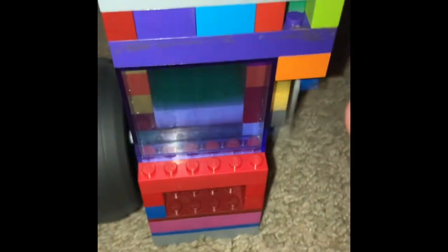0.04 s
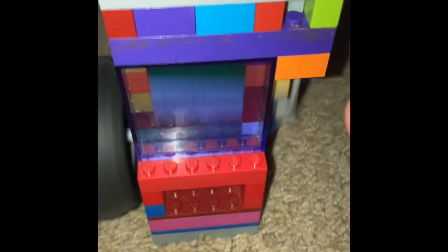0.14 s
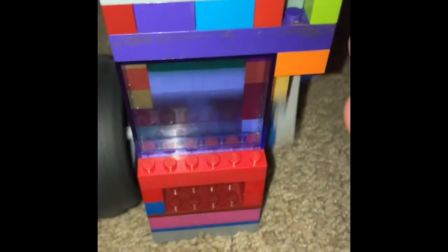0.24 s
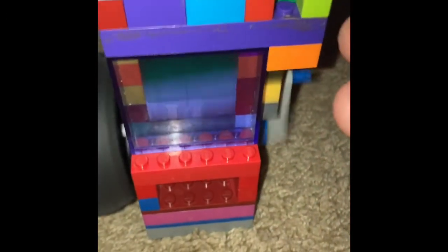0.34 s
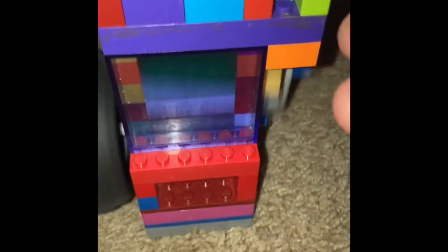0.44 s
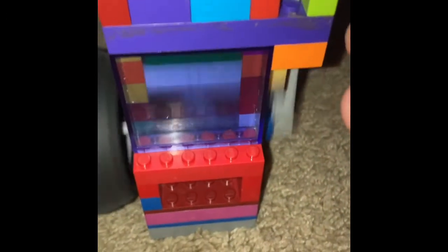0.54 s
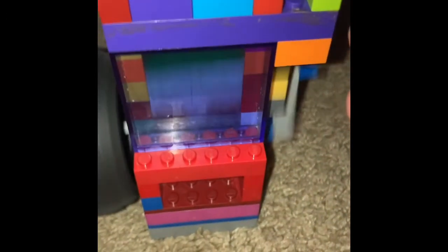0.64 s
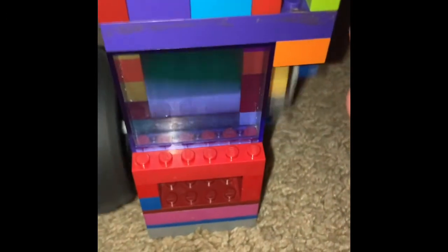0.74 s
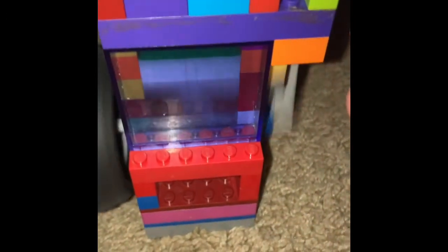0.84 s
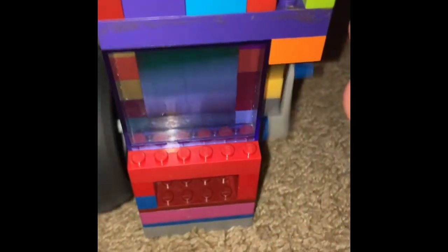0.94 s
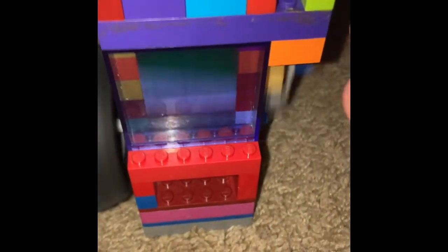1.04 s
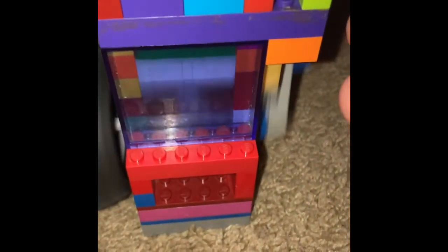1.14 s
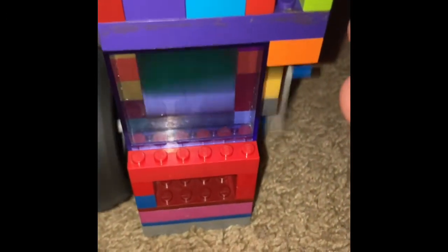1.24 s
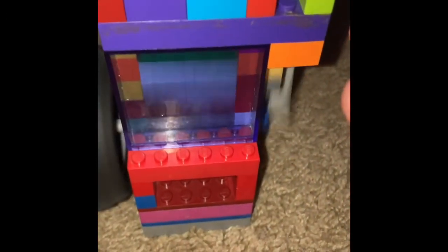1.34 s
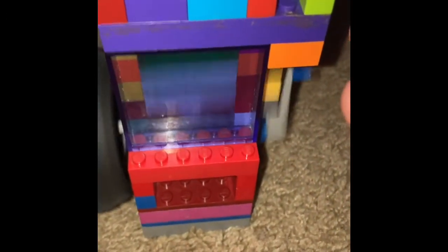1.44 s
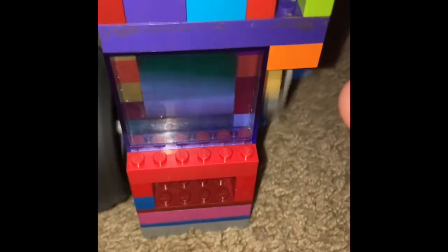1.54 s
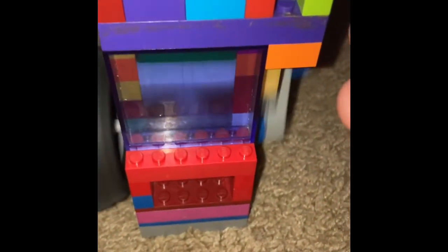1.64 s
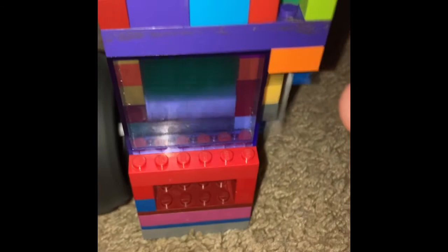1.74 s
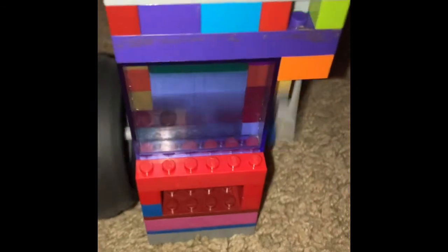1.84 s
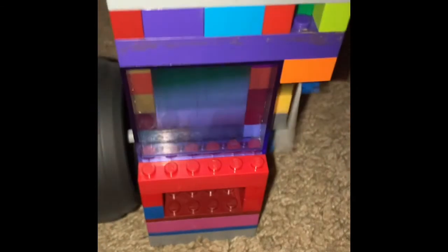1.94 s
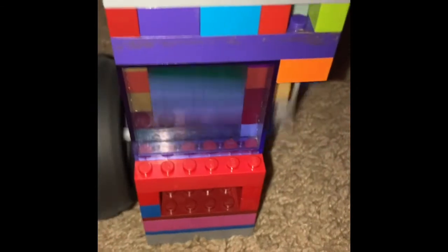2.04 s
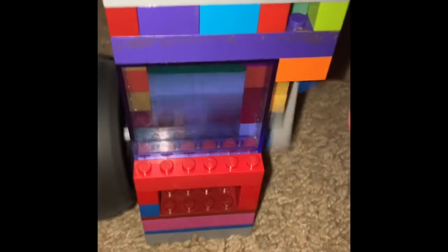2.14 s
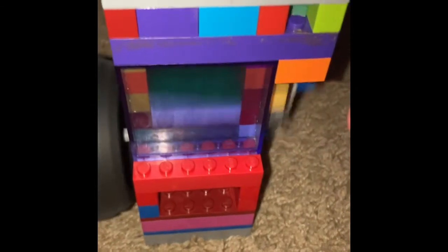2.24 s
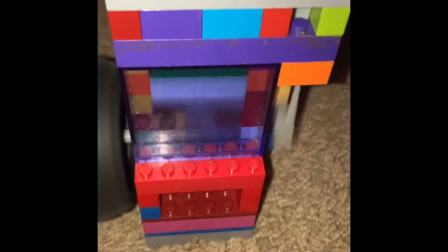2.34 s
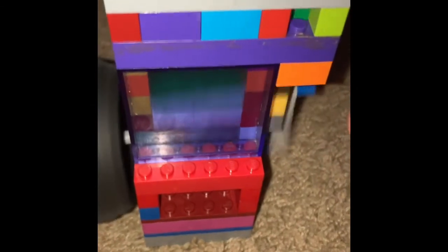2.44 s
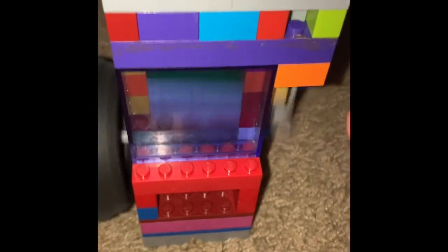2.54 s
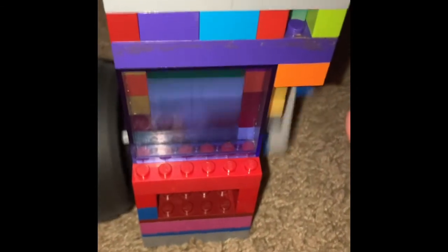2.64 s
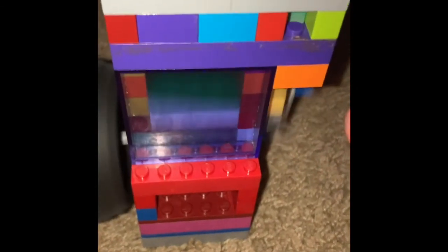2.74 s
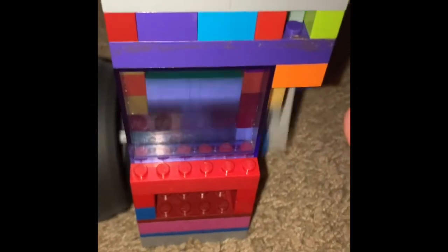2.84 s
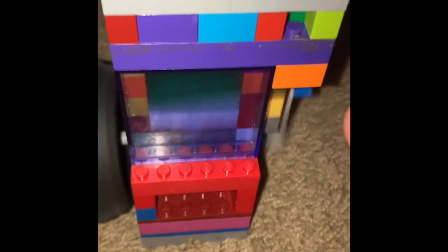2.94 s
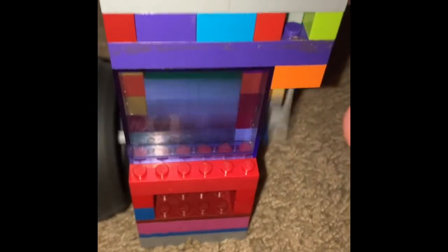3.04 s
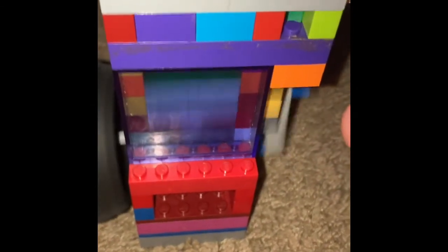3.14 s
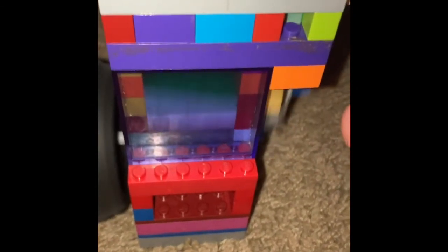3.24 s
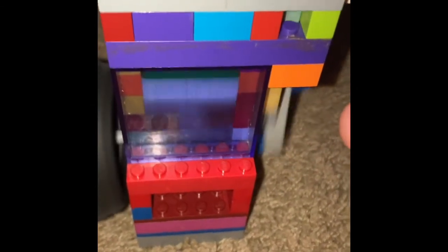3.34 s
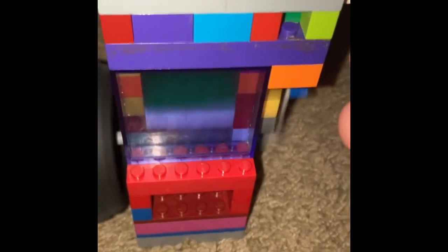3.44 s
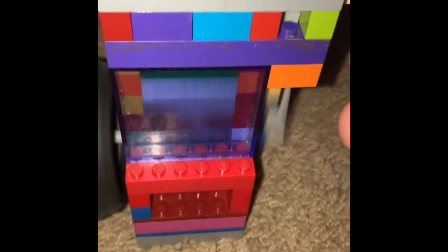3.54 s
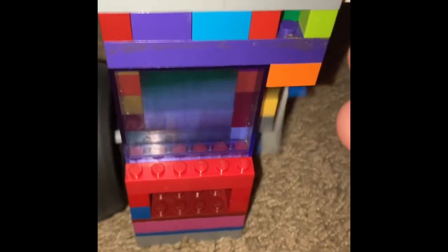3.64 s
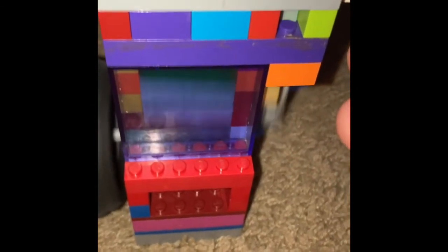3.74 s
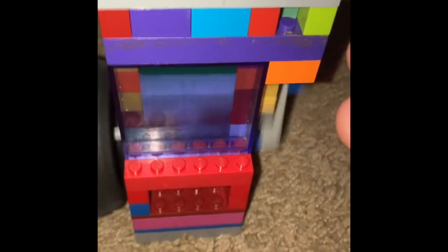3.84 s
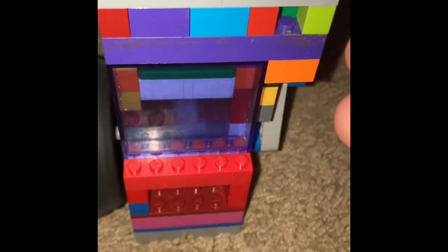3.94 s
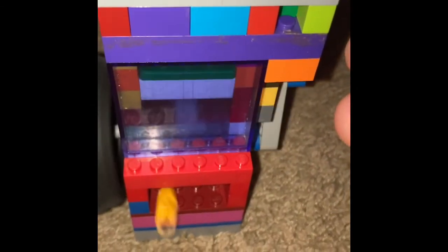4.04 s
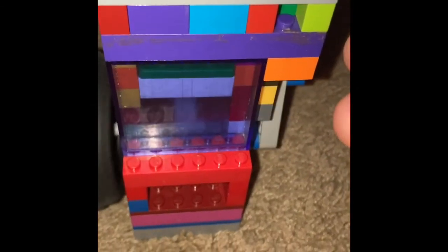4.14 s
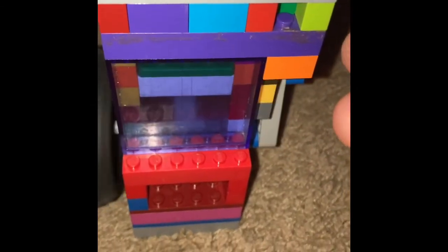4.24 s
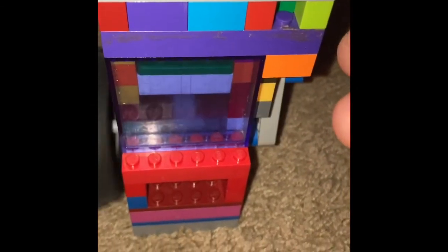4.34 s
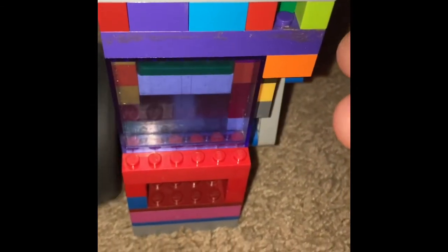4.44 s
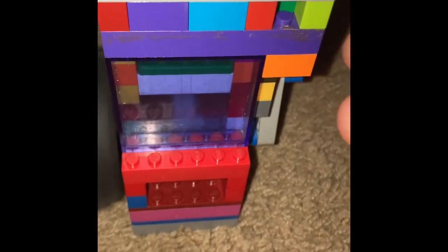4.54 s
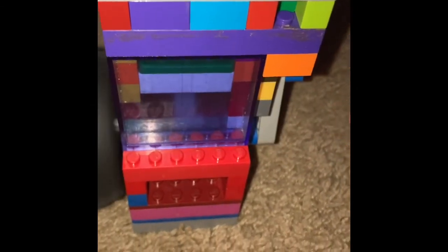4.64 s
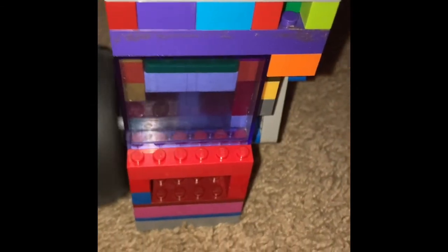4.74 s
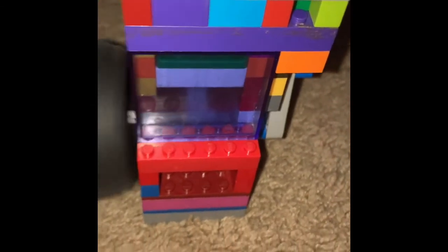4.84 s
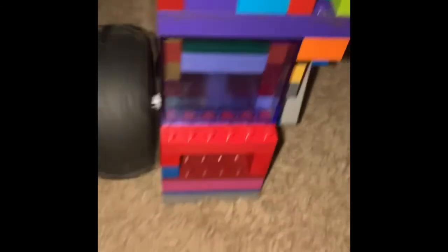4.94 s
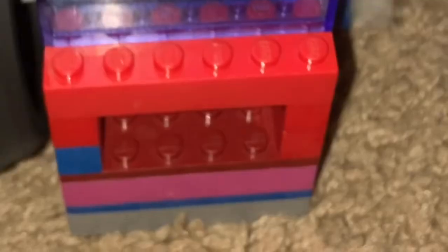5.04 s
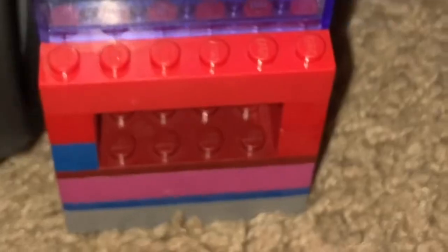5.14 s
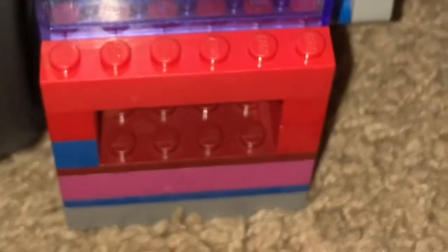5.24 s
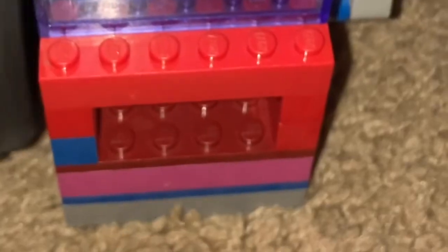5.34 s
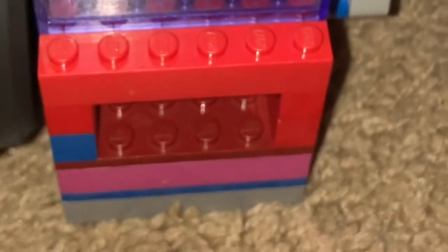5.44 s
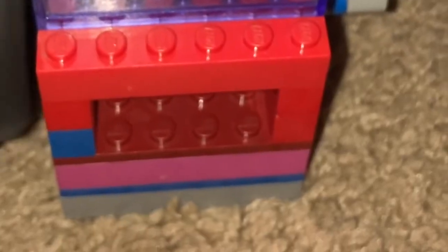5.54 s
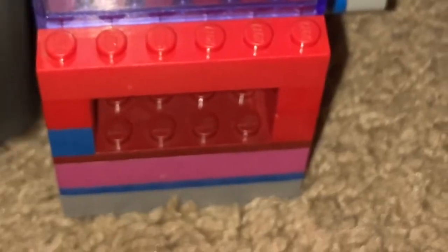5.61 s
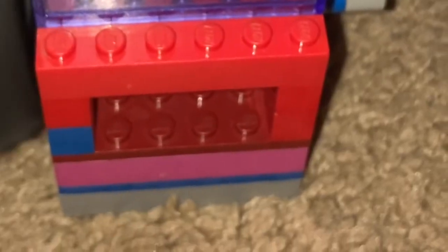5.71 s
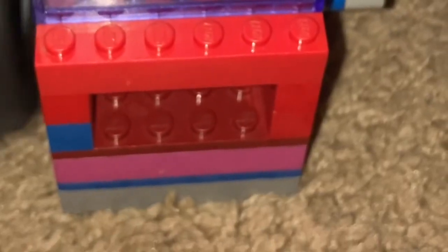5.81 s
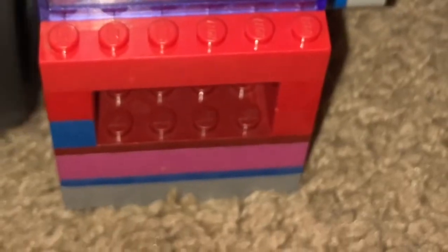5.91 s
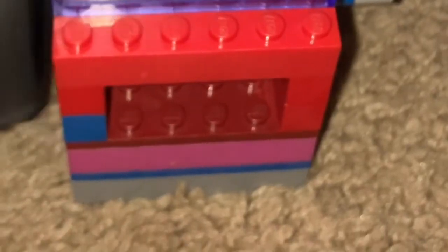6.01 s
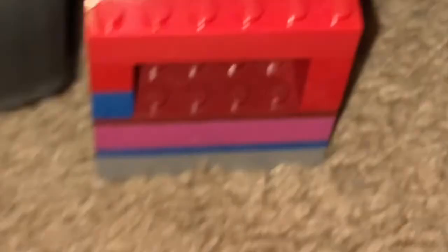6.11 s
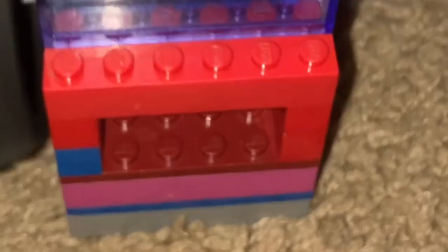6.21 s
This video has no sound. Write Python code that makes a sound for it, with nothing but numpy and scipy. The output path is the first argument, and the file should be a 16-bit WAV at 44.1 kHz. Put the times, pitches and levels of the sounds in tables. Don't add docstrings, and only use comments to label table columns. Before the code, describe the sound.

Rapid hollow plastic knocking and hissing air over a vacuum cleaner's drone stop with a clack; the stall repeats, then a deeper slowed rattle begins.

```python
import sys
import numpy as np
from scipy import signal
from scipy.fft import rfft, irfft, next_fast_len
from scipy.io import wavfile
from scipy.ndimage import uniform_filter1d, map_coordinates

SR = 44100
rng = np.random.default_rng(int(sys.argv[2]) if len(sys.argv) > 2 else 0)


def bounce(signal):
    frames = np.transpose(np.atleast_2d(signal))
    limited = np.clip(frames, -1, 1)
    pcm = np.round(limited * 32767).astype(np.int16)
    wavfile.write(sys.argv[1], SR, pcm)


def level_to_linear(level):
    exponent = np.asarray(level, float) / 20
    return 10 ** exponent


N = 276507
TIME = np.arange(N) / SR
SIZE = next_fast_len(N)
HZ = np.fft.rfftfreq(SIZE, 1 / SR)

# [f/Hz, level/dB]
CLEANER_ROAR = [(28, -48), (60, -13), (110, -13), (200, 2), (350, -0.5), (420, -10), (560, -15), (680, -6),
                (950, -8), (1200, -16.5), (2500, -24.5), (5000, -21.5), (9500, -14.5), (15500, -16.5)]
# [f/Hz, level re roar/dB]
MOTOR_LINES = [(632.5, -8.5), (897, -16), (119.8, -19.5)]
# [t/s, speed/(turns/s)]
CRANK_SPEED = [(0, 22.63), (.3, 23.083), (.6, 23.183), (1, 23.879), (1.6, 24.178), (2, 24.24),
               (2.3, 23.886), (2.6, 24.137), (3.3, 24.102), (3.9, 24.329)]
# [multiple of crank speed, level/dB]
HOSE_ORDERS = [(1, -34), (2, -28), (3, 0), (4, -14), (5, -1), (6, -15), (7, -3.5), (8, -6.5), (9, -5.5),
               (10, -7), (11, -10.5), (12, -10.5), (13, -12), (14, -27.5), (15, -14.5), (16, -16), (17, -6),
               (18, -14.5), (19, -10), (20, -14), (21, -17.5), (22, -19)]
# [angle/turns, cylinder ring/dB, base thud/dB, wall clack/dB, stud tick/dB]
TURN_KNOCKS = [(-.04, -13, -39, -28, -22.5), (.0, -74, -58, -26.5, -26), (0.157, -31.5, -26.5, -56, -34.5),
               (0.261, -14.5, -29.5, -26, -22), (0.388, -19.5, -25, -22.5, -39),
               (0.434, -20.5, -35, -30, -22), (0.522, -24, -39, -42.5, -23), (0.673, -42, -26, -27, -22),
               (0.717, -35, -25, -44, -23.5), (0.778, -54, -43, -25, -30), (0.84, -28, -35, -28.5, -27.5)]
# [t/s, ring/dB, thud/dB, clack/dB, tick/dB]
STALL_KNOCKS = [
    (3.891, -22.5, -20, -26, -23),
    (3.899, -34, -37, -19, -31),
    (3.921, -44, -44, -25, -26),
]
# [f/Hz, width/Hz, level/dB]
CYLINDER_MODES = [(1378, 45, -9), (1345, 260, 17.5), (1290, 70, -14), (1090, 130, -6), (840, 110, -11),
                  (660, 120, -12)]
# [f/Hz, width/Hz, level/dB]
BASE_MODES = [(398, 76, -10), (588, 56, -6.5), (724, 240, 23)]
# [f/Hz, level/dB]
WALL_CLACK = [(900, -66), (1600, 4.5), (2100, -2.5), (2800, 1), (3300, -9), (4150, 6.5), (5200, -1),
              (6500, -8)]
# [f/Hz, level/dB]
STUD_TICK = [(3000, -6), (5500, -12.5), (6800, -7.5), (8000, 1.5), (9600, 3), (11000, -5.5), (13000, -16.5),
             (16000, -14.5)]
# [f/Hz, level/dB]
AIR_LEAK = [(40, -39), (150, -10), (400, -8), (900, -7), (1300, -2.5), (1500, -8), (2700, -11), (4000, -12),
            (6500, -11.5), (9000, -14.5), (12000, -14.5), (16000, -29.5)]
# [f/Hz, left lead/rad, likeness/0-1, left minus right/dB]
ENGINE_PORTS = [(60, 0, 0.9, -3.5), (150, -0.05, 0.75, -1.3), (700, -0.39, 1, 0), (3067, -2, 0.48, -1),
                (3866, -4.5, .7, -1), (5853, -2.5, 0.93, -.5), (8800, 0, 0.91, .3), (18030, 10.5, 1, -0.5)]
# [f/Hz, left lead/rad, likeness/0-1, left minus right/dB]
CLEANER_PORTS = [(0, 0, 1, -1.6), (400, 0.23, .95, -0.58), (1020, 1.06, .8, 0.19), (1900, 0.94, 0.25, -1.2),
                 (5280, -3.5, 0.93, 0), (7820, -0.5, 0.31, 0), (11670, 2.5, 1, 0), (14300, 6.4, .9, 0)]
# [low f/Hz, high f/Hz, margin/dB, cut/dB]
THINNED_BANDS = [(3100, 3450, 4, -40), (3450, 3750, 5, -40), (4700, 5150, 10, -60), (5150, 5700, 8, -60),
                 (7500, 9000, 3, -40), (11050, 12300, 3, -60), (13900, 17600, 0, -50)]
SCENE_CHANGES_S = [
    4.941,
    6.14,
]

STALL_S = 3.864
START_TURN = -0.72
RUN_FADE_DB_PER_S = 0.37
LIFT_S = 3.93


def evened(x):
    return x / np.sqrt(np.mean(x ** 2) + 1e-20)


def ramp(start_s, rise_s):
    return np.clip((TIME - start_s) / rise_s, 0, 1)


def wobble(step_s):
    at_s = np.arange(0, TIME[-1] + 1, step_s)
    return 1.304 * np.interp(TIME, at_s, rng.standard_normal(len(at_s)))


def colour(x, spectrum):
    hz, db = np.transpose(spectrum)
    gain = level_to_linear(np.interp(np.log(HZ + 1), np.log(hz), db))
    return irfft(rfft(x, SIZE) * evened(gain), SIZE)[:, :N]


def ring(x, modes, rise_s):
    t = np.arange(3000) / SR
    tap = 0
    for hz, width_hz, db in modes:
        tap = tap + level_to_linear(db) * np.exp(-np.pi * width_hz * t) * np.sin(2 * np.pi * hz * t)
    return signal.oaconvolve(x, tap * (1 - np.exp(-t / rise_s)) ** 2)[:N]


def burst(train, fade_s, spectrum, noise):
    envelope = signal.lfilter([1], [1, -np.exp(-1 / (fade_s * SR))], train)
    return colour(envelope * noise, spectrum)


def floor_echo(x, t60_s=0.086, wet_db=-14):
    t = np.arange(6000) / SR
    tail = rng.standard_normal((2, len(t))) * level_to_linear(-60 * t / t60_s) * (t > 0.003)
    return x + level_to_linear(wet_db) * signal.oaconvolve(x, tail / np.linalg.norm(tail[0]), axes=1)[:, :N]


def ports(pair, table):
    hz, lead, like, db = np.transpose(table)
    lead_rad = np.interp(HZ, hz, lead)
    likeness = np.interp(HZ, hz, np.clip(like, 0, 1))
    level_db = np.interp(HZ, hz, db)
    shared, unrelated = rfft(pair, SIZE)
    near = np.sqrt((1 + likeness) / 2) * shared
    apart = np.sqrt((1 - likeness) / 2) * unrelated
    half = np.exp(0.5j * lead_rad) * level_to_linear(level_db / 2)
    return irfft([(near + apart) * half, (near - apart) / half], SIZE)[:, :N]


def cleaner():
    swell_db = 3.5 * ramp(LIFT_S, 0.097) + 4.5 * ramp(4.295, 0.27)
    roar = colour(rng.standard_normal((2, N)), CLEANER_ROAR) * level_to_linear(0.88 * wobble(0.028))
    for hz, db in MOTOR_LINES:
        line_hz = hz * (1 + 0.0008 * wobble(0.1) + 0.00896 * ramp(LIFT_S, 0.9))
        line_amp = level_to_linear(db + 1.5 + 0.8 * wobble(0.05))
        roar[0] += line_amp * np.sin(2 * np.pi * np.cumsum(line_hz) / SR)
    return level_to_linear(-36.5 + swell_db) * roar


def crank_turns():
    t_s, speed = np.transpose(CRANK_SPEED)
    return START_TURN + np.cumsum(np.interp(TIME, t_s, speed)) / SR


def crank_moment_s(turns, angle):
    return np.interp(angle, turns, TIME, left=-1)


def run_db(s):
    return RUN_FADE_DB_PER_S * (STALL_S - s)


def turn_noise(turns):
    repeat_share, slip_s = 0.75, 0.000045
    steps = SR // 24
    at = (turns + 24 * slip_s * wobble(0.02)) % 1 * steps
    wear = [map_coordinates(c, [at], order=3, mode="grid-wrap") for c in rng.standard_normal((4, steps))]
    drift_rad = 0.9 * wobble(0.5)
    same = evened(np.cos(drift_rad) * np.array(wear[:2]) + np.sin(drift_rad) * np.array(wear[2:]))
    return np.sqrt(repeat_share) * same + np.sqrt(1 - repeat_share) * rng.standard_normal((2, N))


def air_leak(turns):
    leak_db = -27.5 + 0.77 * np.cos(2 * np.pi * (turns - 0.9)) + 2.1 * wobble(0.0022)
    dying_db = -13 * ramp(STALL_S, 0.004) - 34 * ramp(STALL_S, 0.29) ** 2
    return level_to_linear(leak_db + run_db(TIME) + dying_db) * colour(turn_noise(turns), AIR_LEAK)


def hose_pulsing(turns):
    hum = np.zeros(N)
    for order, db in HOSE_ORDERS:
        lag_turns = 0.078 * order + 0.005485 * order ** 2 + 0.2 * rng.standard_normal()
        sway_db = 0.04 * order * wobble(0.07)
        hum += level_to_linear(db + sway_db) * np.cos(2 * np.pi * (order * turns - lag_turns))
    return level_to_linear(-32 + 2.5) * hum


def flywheel_settle():
    t = np.maximum(TIME - 3.93, 0)
    return level_to_linear(-41.5) * (t / 0.03) * np.exp(1 - t / 0.018) * np.sin(2 * np.pi * 65 * t)


def knock_trains(turns):
    jitter_s, spread_db, settle_s = 0.00004, 1.5, 1.0
    table = np.array(TURN_KNOCKS)
    angle = table[:, 0]
    turn = np.arange(-1, 93)[:, None]
    chance = rng.standard_normal((len(turn), len(table), 5))
    s = crank_moment_s(turns, turn + angle) + jitter_s * chance[..., 0]
    slow_db = (-0.5 + 4.5 * np.cos(2 * np.pi * angle)) * np.exp(-s / settle_s)
    db = (slow_db + run_db(s))[..., None] + table[:, 1:5]
    db = db + spread_db * chance[..., 1:] * [0.29, 0.34, 0.68, 0.74]
    keep = (s > 0) & (s < STALL_S - 0.012)
    late = np.array(STALL_KNOCKS)
    s = np.r_[s[keep], late[:, 0]]
    db = np.r_[db[keep], late[:, 1:]]
    trains = np.zeros((4, N))
    np.add.at(trains.T, (s * SR).astype(int), level_to_linear(db))
    trains[2:] = np.roll(trains[2:], 10, axis=1)
    trains[0] = np.roll(trains[0], -90)
    return trains


def cylinder(ring_clicks, turns, running):
    shut_turn, open_turn, open_db = -0.15, 0.476, -5.5
    shut = (turns - shut_turn) % 1 < open_turn - shut_turn
    valve = level_to_linear(open_db * uniform_filter1d(1. - shut, size=60))
    whistle = evened(ring(rng.standard_normal(N), [(1365, 70, 0)], 0.0001))
    sound = valve * (ring(ring_clicks, CYLINDER_MODES, 0.0016) + level_to_linear(-37) * running * whistle)
    low_pass = signal.cheby2(N=8, rs=22, Wn=1500, fs=SR, output="sos")
    return level_to_linear(2) * signal.sosfilt(low_pass, sound)


def engine():
    turns = crank_turns()
    running = level_to_linear(run_db(TIME)) * np.clip((STALL_S + 0.008 - TIME) / 0.015, 0, 1)
    ring_clicks, thud_clicks, clack_clicks, tick_clicks = knock_trains(turns)
    tonal = hose_pulsing(turns) * running + cylinder(ring_clicks, turns, running)
    tonal += level_to_linear(-4) * ring(thud_clicks, BASE_MODES, 0.0045) + flywheel_settle()
    grit = turn_noise(turns)
    clack = level_to_linear(2) * burst(clack_clicks, 0.0021, WALL_CLACK, grit)
    tick = burst(tick_clicks, 0.0011, STUD_TICK, grit)
    return tonal * [[1], [0]] + air_leak(turns) + clack + tick


def scene():
    return ports(cleaner(), CLEANER_PORTS) + ports(floor_echo(engine()), ENGINE_PORTS)


def thin_weaker(x, bands):
    hz, _, z = signal.stft([x[0] + x[1], x[0] - x[1]], SR, nperseg=2048, noverlap=1536)
    frames = z.shape[2]
    spared = np.repeat(rng.random(frames // 3 + 1) < 0.09, 3)[:frames]
    for low_hz, high_hz, margin_db, cut_db in bands:
        band = (hz > low_hz) & (hz < high_hz)
        power = (abs(z[:, band]) ** 2).sum(1)
        db = 10 * np.log10(uniform_filter1d(power, size=2, axis=1) + 1e-20)
        weaker = (db < db[::-1] - margin_db) & ~spared
        z[:, band] *= np.where(weaker, level_to_linear(cut_db), 1)[:, None]
    z[:, hz > 17600] = 0
    mid, side = signal.istft(z, SR, nperseg=2048, noverlap=1536)[1][:, :N]
    return np.array([mid + side, mid - side]) / 2


def slow_motion(x):
    source_s = crank_moment_s(crank_turns(), 48) + (TIME - 6.1725) * 2 / 3
    at = np.clip(source_s, 0, 3) * SR
    return level_to_linear(-0.5) * np.array([map_coordinates(c, [at], order=3) for c in x])


def top_cut(x):
    return signal.sosfilt(signal.butter(12, 16150, fs=SR, output="sos"), x)


def record(dry):
    run = thin_weaker(dry, THINNED_BANDS)
    stall_again = np.roll(run, 54390, axis=1)
    slowed = slow_motion(thin_weaker(dry, THINNED_BANDS[-2:]))
    starts_s = [-1, *SCENE_CHANGES_S]
    ends_s = [*SCENE_CHANGES_S, 99]
    mix = np.zeros_like(dry)
    for piece, start_s, end_s in zip([run, stall_again, slowed], starts_s, ends_s):
        mix += piece * ramp(start_s, 0.033) * np.clip((end_s - TIME) / 0.036, 0, 1)
    mix = irfft(rfft(mix, SIZE) * (HZ < 16080), SIZE)[:, :N]
    return top_cut(mix)


dry = scene()
out = record(dry)
bounce(out)
```